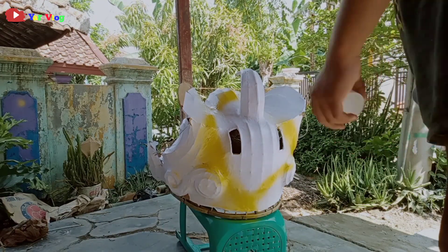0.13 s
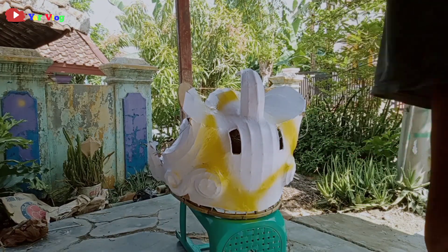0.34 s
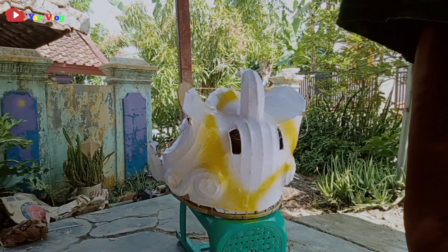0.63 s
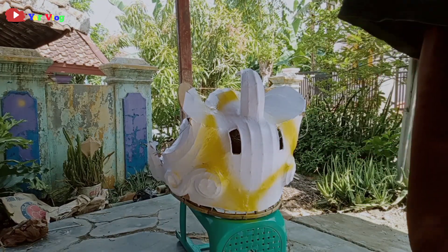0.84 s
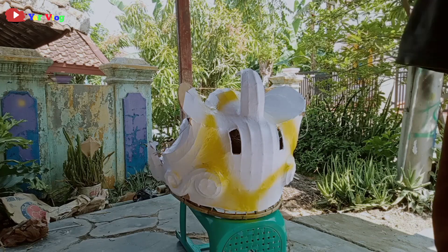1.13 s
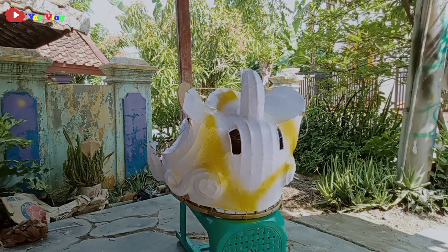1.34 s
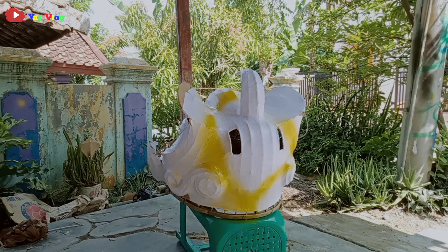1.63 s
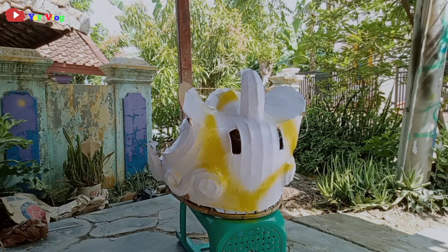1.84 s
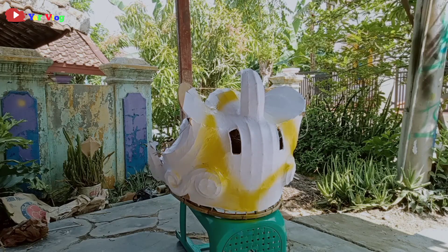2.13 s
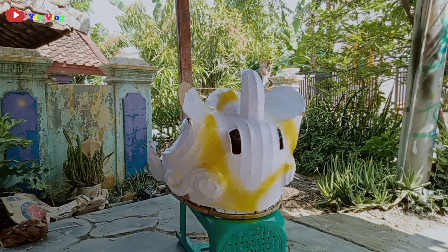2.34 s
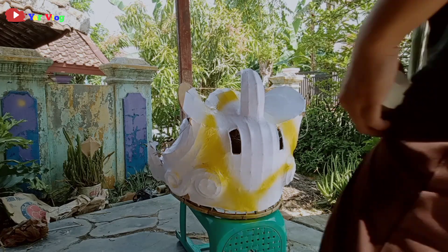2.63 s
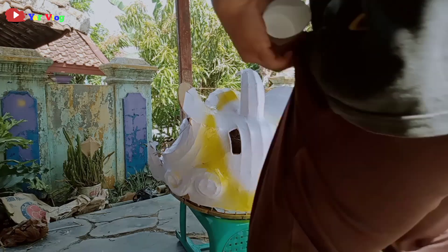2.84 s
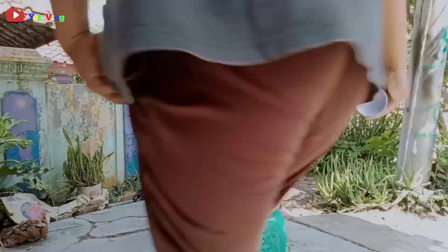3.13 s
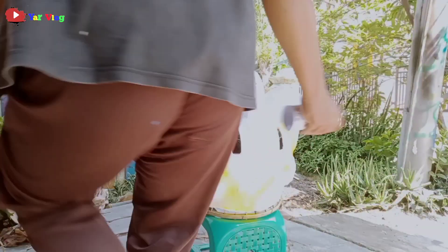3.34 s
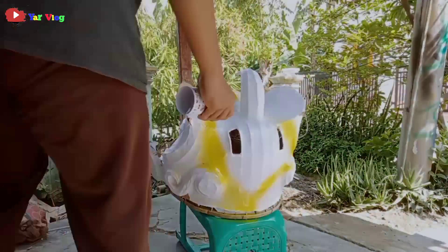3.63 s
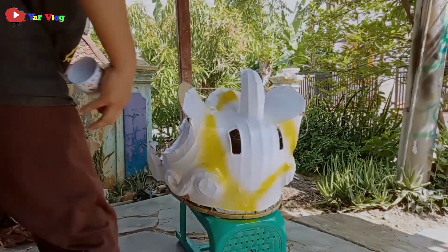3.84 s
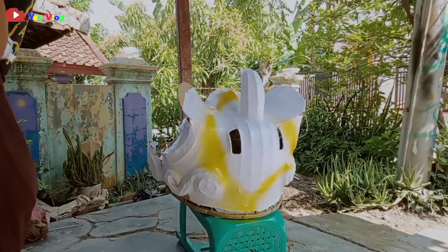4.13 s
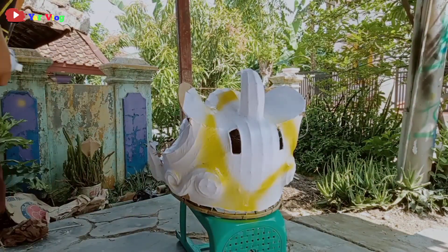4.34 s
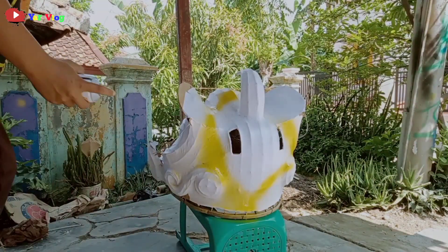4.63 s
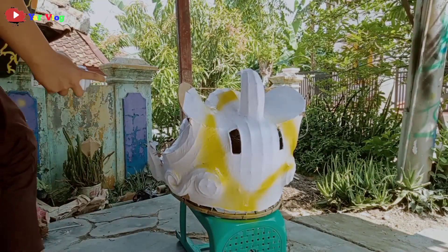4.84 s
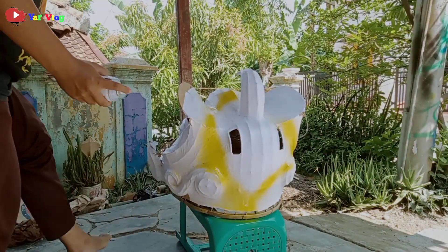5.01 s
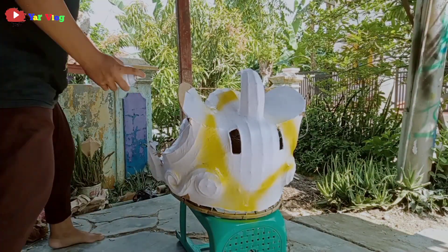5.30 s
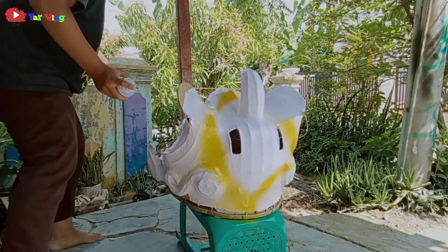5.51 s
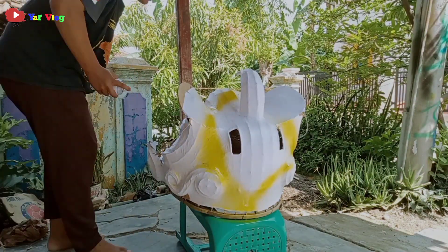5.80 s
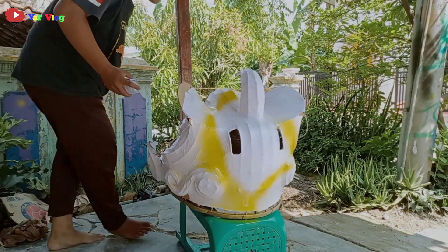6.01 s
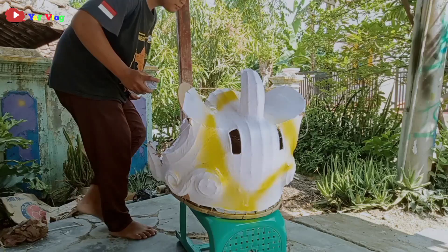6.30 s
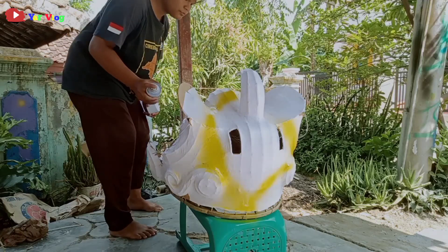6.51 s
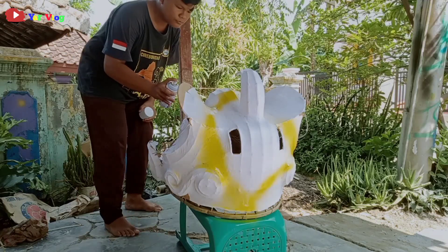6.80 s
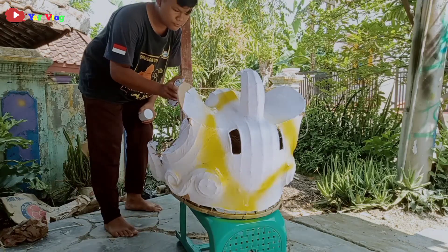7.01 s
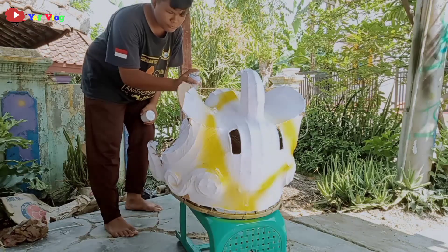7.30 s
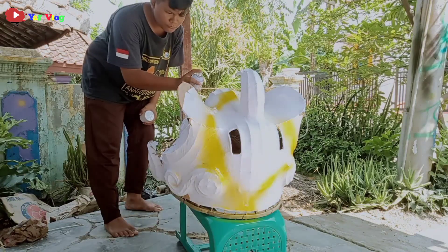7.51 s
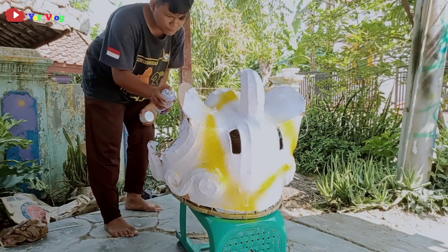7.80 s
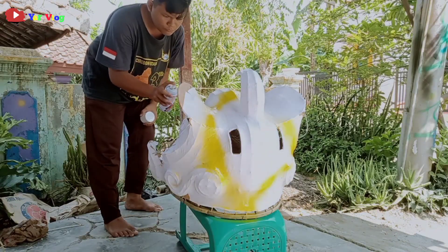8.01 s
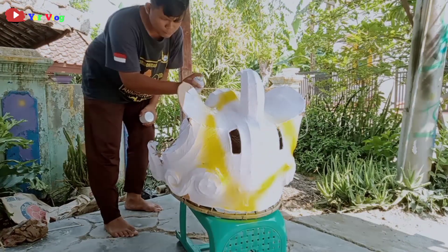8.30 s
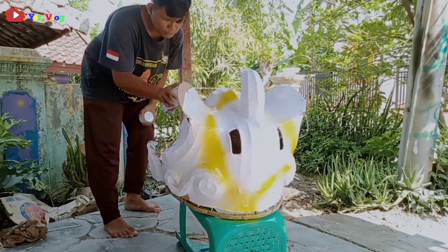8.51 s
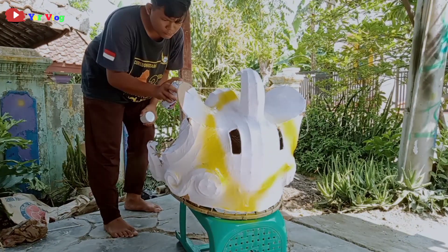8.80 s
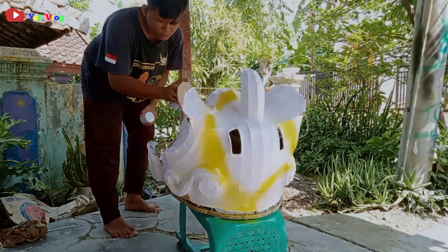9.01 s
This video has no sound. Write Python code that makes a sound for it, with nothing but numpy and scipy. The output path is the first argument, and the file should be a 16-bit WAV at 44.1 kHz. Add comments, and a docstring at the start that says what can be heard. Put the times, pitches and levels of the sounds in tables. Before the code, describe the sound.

Sharp metallic rattling of a ball inside a paint can, loosening and stopping, then brief spray bursts outdoors with a stray bird chirp.

```python
"""A can rattles on a paved terrace as it is shaken: a mixing ball knocks its ends, chatters and stirs paint.
Then three short bursts of noise hiss from the nozzle and drum on a hollow paper model.
Knocks are short impulse trains ringing damped modes; bird notes and hum are sines; town rumble and
footfalls are shaped noise. Short noise tails give the answer of the terrace."""
import sys
import numpy as np
from scipy import signal
from scipy.fft import rfft, irfft, next_fast_len
from scipy.io import wavfile
from scipy.ndimage import map_coordinates

SR = 44100
rng = np.random.default_rng(int(sys.argv[2]) if len(sys.argv) > 2 else 0)


def persist_wave(psi):
    """Save psi, clipped to +-1, as 16-bit WAV."""
    counts = np.round(np.clip(psi, -1, 1) * 32767).astype(np.int16)
    wavfile.write(sys.argv[1], SR, np.atleast_2d(counts).T)


N = 403515


def amp(db):
    """Gain of a level in dB."""
    return 10 ** (np.asarray(db) / 20)


def unit(x):
    """x at rms 1."""
    return x / np.sqrt(np.mean(x ** 2) + 1e-20)


def along(points, hz):
    """Values of (f/Hz, value) points, read on a log frequency axis."""
    f, v = np.transpose(points)
    return np.interp(np.log(hz + 1), np.log(f + 1), v)


def wobble(knots_hz):
    """Smooth random curve through normal knots."""
    knots = rng.standard_normal(int(N * knots_hz / SR) + 4)
    return map_coordinates(knots, [np.arange(N) * knots_hz / SR])


def filtered(x, response):
    """x times a complex response of frequency."""
    m = next_fast_len(N + SR // 2)
    return irfft(rfft(x, m) * response(np.fft.rfftfreq(m, 1 / SR)), m)[..., :N]


def resonance(f, center_hz, width_hz):
    """Band-pass mode, squared for steep skirts and a focused ring."""
    return (1j * f * width_hz / (center_hz ** 2 - f * f + 1j * f * width_hz)) ** 2


def ringing(train, modes):
    """One impulse train rings all modes."""
    center_hz, width_hz, db = np.transpose(modes)[..., None]
    return filtered(train, lambda f: amp(db) * resonance(f, center_hz, width_hz)).sum(0)


def rush(spectrum):
    """Noise of rms 1 with the given spectrum."""
    return unit(filtered(rng.standard_normal(N), lambda hz: amp(along(spectrum, hz))))


def gate(start_s, stop_s, edge_s, tail_s=None):
    """Open from start to stop with soft edges; the close may be slower."""
    t = np.arange(N) / SR
    ramp = np.minimum((t - start_s) / edge_s, (stop_s - t) / (tail_s or edge_s))
    return np.clip(ramp + .5, 0, 1) ** 2


# rumble and leaves, relative spectrum: f/Hz, level/dB per Hz
GARDEN = [(22, -15.5), (123, -1), (301, -16.5), (405, -5), (489, -22), (591, -7.5), (1230, -19.5),
          (1790, -13), (16000, -52.5)]
# hum partials: f/Hz, level/dB
HUM = [(115, -62), (300, -62.5), (440, -61.5), (699, -61.5)]
# dull thumps of passing feet: t/s, level/dB
STEPS = [(3.47, -44), (4.013, -51), (4.37, -48.5)]


def garden():
    """Shaped noise for rumble and leaves, wavering sines for hum, bass noise swells for feet."""
    t = np.arange(N) / SR
    hum = sum(amp(db + 4.1 * wobble(12)) * np.sin(2 * np.pi * hz * t) for hz, db in HUM)
    steps = sum(amp(db) * np.exp(-((t - s - .02) / 0.1) ** 2) for s, db in STEPS)
    thud = rush([(20, -63), (60, -1), (120, -3.5), (220, -48), (400, -120)])
    return amp(-51.5 + 0.29 * wobble(3.6)) * rush(GARDEN) + hum + steps * thud


# decay of the terrace: f/Hz, t60/s
TERRACE = [(400, 0.053), (3000, 0.26), (12000, 0.15)]
WANDER_RAD, WANDER_HZ = 1.6, 170  # phase wander of the echo: depth, knot rate


def terrace(x, part_s=0.15):
    """Paving, wall and posts answer with decaying noise, redrawn each part; random phase makes it diffuse."""
    out, size = np.zeros(N + SR), round(part_s * SR)
    for start in range(0, N, size):
        hz, t, z = signal.stft(rng.standard_normal(SR // 3), SR, nperseg=128)
        decay = amp(-60 * t / along(TERRACE, hz)[:, None])
        tail = signal.istft(z * decay, SR, nperseg=128)[1]
        wet = signal.fftconvolve(x[start:start + size], tail / np.linalg.norm(tail))
        out[start + 90:][:len(wet)] += wet  # 2 ms pre-delay
    analytic = signal.hilbert(out[:N], next_fast_len(N))[:N]
    return np.real(analytic * np.exp(1j * WANDER_RAD * wobble(WANDER_HZ)))


# chirps: t/s, f/Hz, level/dB
CHIRPS = [(7.02, 6400, -51), (8.57, 6380, -42)]


def bird():
    """Thin chirps: a sine with jittered phase and a weak octave, quick onset, drawn-out decay."""
    out, t = np.zeros(N + SR), np.arange(SR // 4) / SR
    for s, hz, db in CHIRPS:
        phase = 2 * np.pi * hz * t + np.cumsum(rng.normal(0, 0.048, len(t)))
        swell = amp(db - 60 * t / 0.16) * (1 - np.exp(-t / 0.0014))
        octave = amp(-18 - 60 * t / 0.17) * np.sin(2 * phase)
        out[round(s * SR):][:len(t)] += swell * (np.sin(phase) + octave)
    return out[:N]


# points of one swooping bird note: t/s, f/Hz, level/dB
TWITTER = [(3.225, 4900, -41), (3.243, 4100, -37), (3.256, 4630, -44)]


def twitter():
    """One thin sine that swoops down and up again."""
    s, hz, db = np.transpose(TWITTER)
    t = np.arange(N) / SR
    phase = 2 * np.pi * np.cumsum(np.interp(t, s, hz)) / SR
    return amp(np.interp(t, s, db, -200, -200)) * np.sin(phase)


# small ticks of can and feet: t/s, level before the scuff filter/dB
TICKS = [(8.5765, -32.5), (8.669, -36), (8.739, -34.5), (8.888, -34.5)]
# clothes and feet shifting: from t/s, to t/s, level before the scuff filter/dB
RUSTLE = [(6.896, 8.16, -46.5), (8.38, 8.96, -42.5)]


def ticks():
    """Decaying noise clicks over an uneven noise rustle, both dulled by one filter."""
    clicks, t = np.zeros(N + SR), np.arange(SR // 10) / SR
    for s, db in TICKS:
        clicks[round(s * SR):][:len(t)] += amp(db - 60 * t / 0.12) * rng.standard_normal(len(t))
    swell = sum(amp(db) * gate(start, stop, 0.15) for start, stop, db in RUSTLE)
    rustle = swell * amp(3.0 * wobble(12)) * rng.standard_normal(N)
    scuff = [(150, 5.5), (450, 1), (2800, 0.5), (7000, -20.0), (16000, -62)]
    return filtered(clicks[:N] + rustle, lambda hz: amp(along(scuff, hz)))


# bursts: from t/s, to t/s, hiss level/dB, splash level/dB
SPRAY = [(7.392, 7.63, -44, -58), (8.187, 8.46, -45, -57.5), (8.962, 9.3, -41, -43)]
# nozzle, relative spectrum: f/Hz, level/dB per Hz
HISS = [(1180, -15.5), (2000, -9), (3100, -7), (4300, -15), (9840, -33.5), (15500, -31)]
# paint drumming on the paper shell, relative spectrum: f/Hz, level/dB per Hz
SPLASH = [(120, -51), (200, -12), (437, -0.5), (542, -6), (6000, -30), (13200, -120)]


def spray():
    """Nozzle hiss and paint drumming on the paper shell: two gated, fluctuating noises."""
    hiss = rush(HISS) * amp(2.0 * wobble(23))
    splash = rush(SPLASH) * amp(2.5 * wobble(40))
    out = 0
    for start, stop, hiss_db, splash_db in SPRAY:
        burst = amp(hiss_db) * hiss + amp(splash_db) * splash
        out = out + gate(start, stop, 0.029, tail_s=0.05) * burst
    return out


# ball rolling through the paint: from t/s, to t/s, level/dB
CHATTER = [(0, 0.027, -25.5), (0.368, 0.46, -37), (0.627, 0.823, -46.5), (0.9, 0.988, -37),
           (2.101, 2.197, -34.5), (4.068, 4.14, -42)]


def chatter(per_s=1500, spread_db=5):
    """Dense tiny contacts of uneven size ring the modes of the can."""
    grains = (rng.random(N) < per_s / SR) * rng.standard_normal(N) * amp(spread_db * wobble(60))
    can = ringing(grains, CLACK) + amp(4) * ringing(grains, WALL) + amp(3) * ringing(grains, BODY)
    return sum(amp(db) * gate(start, stop, 0.079) for start, stop, db in CHATTER) * unit(can)


# blows of the ball: t/s, strength level/dB, hardness/dB
BLOWS = [(0.041, -20, -23), (0.123, -6, -5.5), (0.251, -17.5, -13), (0.274, -15, -17.5), (0.367, -6.5, -16),
         (0.384, -7.5, -7.5), (0.505, -16.5, -15), (0.52, -23, -11.5), (0.567, -25, -11), (0.619, -7, -9),
         (0.645, -10.5, -6), (0.68, -18, -1), (0.707, -13, -17.5), (0.922, -24, -23), (0.934, -19.5, -10),
         (0.969, -15, -11.5), (0.99, -22, -22), (1.032, -30, -11), (1.083, -2, -17), (1.096, -19, 3),
         (1.135, -19, -7), (1.18, -9, -11), (1.279, -19.5, -2.5), (1.339, -11.5, -6), (1.444, -20.5, -10.5),
         (1.488, -20.5, -7), (1.61, -12, -8.5), (1.637, -11.5, -6), (1.667, -17.5, -8.5),
         (1.702, -14.5, -11.5), (1.725, -22, -20), (1.845, -9.5, -5.5), (1.953, -11.5, -7),
         (1.979, -21, -17.5), (2.107, -13.5, -15), (2.147, -14.5, -2.5), (2.179, -11.5, -11.5),
         (2.201, -22, -19), (2.287, -23, 0), (2.3, -10.5, -11), (2.416, -15.5, -6.5), (2.436, -13.5, -13),
         (2.552, -16, -4), (2.601, -18, -15), (2.633, -15, -6.5), (2.659, -11.5, -11), (2.761, -12, -9.5),
         (2.771, -16.5, 1.5), (2.872, -15.5, -18.5), (3.015, -14.5, -6), (3.024, -6, -5), (3.04, -10, -7),
         (3.092, -13, -11.5), (3.124, -17.5, -11.5), (3.239, -16.5, -14), (3.249, -7, -18),
         (3.271, -0.5, -15.5), (3.279, -9, -5.5), (3.318, -5, -11.5), (3.38, -15, -18), (3.452, -6.5, -8),
         (3.482, -11, -7), (3.599, -1, -9), (3.628, -1.5, -13.5), (3.663, -7, -8), (3.687, -8.5, -9.5),
         (3.759, -12.5, -10), (3.816, -16, -17.5), (3.881, -26, -34), (3.889, -23, -24), (3.943, -39, -15),
         (3.964, -21, -19), (4.005, -31, -30), (4.206, -29.5, -9), (4.259, -19, -16.5), (4.324, -23, -9),
         (4.334, -23.5, -7), (4.446, -2.5, -17), (4.452, -1, -12), (4.482, -6.5, -15.5), (4.498, -9, -19),
         (4.509, -11, -19.5), (4.518, -9, -16.5), (4.56, -11, -17.5), (4.644, 1, -12), (4.672, -3, -15.5),
         (4.694, -7, -15), (4.727, -12, -8), (4.755, -21.5, -24), (4.799, -1, -20.5), (4.815, -3, -20.5),
         (4.893, 0, -9.5), (4.901, 2.5, -10), (4.966, -9.5, -12), (4.999, -13, -24.5), (5.027, -28, -11),
         (5.074, -12.5, -13.5), (5.091, -6.5, -14.5), (5.124, -21, -17), (5.171, 0.5, -9),
         (5.186, -10, -12.5), (5.25, -11, -20.5), (5.309, -30.5, -2.5), (5.422, -16, -0.5),
         (5.481, -20.5, -13), (5.521, -12, -17), (5.564, -7, -17), (5.592, -32, 1.5), (5.661, -18.5, 0.5),
         (5.666, -6, -3), (5.744, -20.5, -20), (5.789, -8, -16.5), (5.809, -10.5, -15), (5.879, -11, -8.5),
         (5.886, -6, -3), (6.016, -8, -16), (6.041, -19, -13), (6.151, -21, -13), (6.162, -6.5, -9.5),
         (6.198, -13.5, -10.5), (6.226, -25, -7), (6.246, -8, -14), (6.329, -14, -12.5),
         (6.666, -18, -14.5), (6.739, -25.5, -11), (6.782, -21, -12), (6.836, -33, -7.5),
         (6.876, -34.5, -9)]
BOUNCE_FROM_S, BOUNCE_TO_S = .012, .11  # span after each blow
BOUNCE_DB, BOUNCE_FALL_DB, BOUNCE_DULL_DB = -15, 12, 1  # first level, fall over the span, lost hardness


def contacts(count=4):
    """Every blow, and after each a few weaker, duller knocks at chance moments."""
    s, db, hard_db = np.transpose(BLOWS)[..., None]
    when, size = rng.random((len(s), 2, count)).transpose(1, 0, 2)
    bounce_s = s + BOUNCE_FROM_S + when * (BOUNCE_TO_S - BOUNCE_FROM_S)
    bounce_db = db + BOUNCE_DB - BOUNCE_FALL_DB * when - 8 * size
    bounce_hard_db = np.repeat(hard_db - BOUNCE_DULL_DB, count, axis=1)
    pairs = (s, bounce_s), (db, bounce_db), (hard_db, bounce_hard_db)
    return [np.hstack(pair).ravel() for pair in pairs]


FIRST_DB = -2  # first touch relative to the full contact
SOFT_HZ = 5360  # the film of paint on the ball dulls the ring above
TREBLE_HZ = 6000  # modes above ring from the skid, without the film


def struck(s, smear_db, modes, levels_db, detune, skid_s, skid_db, films=2, pitch=1, count=11, size=3072):
    """First touch, full contact and weaker skid ring each mode at a new strength and pitch per knock."""
    order, f = np.arange(count), np.fft.rfftfreq(size, 1 / SR)
    moment, fade, sign = rng.random((3, len(s), count))
    luck, tune = rng.random((2, len(modes), len(s))) - .5

    touch_s = order * (0.001636 + .0012 * moment)
    late_s = np.where(order > 1, .003 + skid_s * moment ** 1.5, touch_s)
    fall_db = skid_db + smear_db[:, None] - 12 * late_s / skid_s - 13 * fade
    tap_db = np.where(order > 1, fall_db, FIRST_DB * (1 - order))
    taps = np.where(order > 1, np.sign(sign - .5), 1) * amp(tap_db)
    where = (np.arange(len(s))[:, None] * size + np.round(late_s * SR).astype(int)).ravel()

    def train(x):
        """Spectra of the impulse trains, one row per knock."""
        return rfft(np.bincount(where, x.ravel(), len(s) * size).reshape(-1, size))

    film = 1 / (1 + 1.2j * f / SOFT_HZ - (f / SOFT_HZ) ** 2)
    whole = film ** films * train(taps)
    skid = train(taps * amp(-14 * (order < 2)))
    rung = 0
    for (hz, width_hz, _), level_db, one, shift in zip(modes, levels_db, luck, tune):
        center_hz = (hz * pitch * (1 + 2 * detune * shift))[:, None]
        push = amp(level_db + 6 * one)[:, None] * (skid if hz > TREBLE_HZ else whole)
        rung = rung + push * resonance(f, center_hz, width_hz)
    at = np.round(s * SR).astype(int)[:, None] + np.arange(size)
    return np.bincount(at.ravel(), irfft(rung, size).ravel(), N)[:N]


# body modes: f/Hz, width before squaring/Hz, level/dB
BODY = [(538, 267, -6.5), (964, 250, -0.5), (1282, 530, 4), (1690, 730, 0)]
BODY_DB, BODY_GROWS, BODY_SOFT = 10, 0.54, 0.14  # drive/dB, growth per dB strength, loss per dB hardness
DETUNE = 0.12  # each knock draws its clack and body pitches at random within this share


def body(s, strength_db, hard_db, grip_db, thump_db, smear_db):
    """Low knock of the can body with a short skid; the lowest mode thumps."""
    drive_db = BODY_DB + BODY_GROWS * strength_db - BODY_SOFT * hard_db - 0.75 * grip_db
    levels_db = [drive_db + db for _, _, db in BODY]
    levels_db[0] = levels_db[0] + thump_db
    return struck(s, smear_db, BODY, levels_db, DETUNE, skid_s=.012, skid_db=-13)


# wall modes: f/Hz, width before squaring/Hz, level/dB; GRIP moves the pitch
WALL = [(2300, 240, 6), (2750, 600, -4)]
WALL_DB, WALL_GROWS, WALL_SOFT = 8, 0.76, 0.42  # drive/dB, growth per dB strength, loss per dB hardness
WALL_DETUNE = .025  # smaller random share: the wall keeps its pitch better


def wall(s, strength_db, hard_db, wall_hz, grip_db, smear_db):
    """Narrow ring of the wall with a short skid, its pitch following the hold of the can."""
    drive_db = WALL_DB + WALL_GROWS * strength_db - WALL_SOFT * hard_db + grip_db
    levels_db = [drive_db + db for _, _, db in WALL]
    pitch = wall_hz / WALL[0][0]
    return struck(s, smear_db, WALL, levels_db, WALL_DETUNE, skid_s=.012, skid_db=-14, pitch=pitch)


# clack modes: f/Hz, width before squaring/Hz, level/dB
CLACK = [(3330, 1720, 3.5), (4285, 990, 3.5), (4950, 660, -8), (8920, 3800, -20), (15200, 23000, -28)]
CLACK_DB = 23  # drive before strength and hardness
BRIGHTER = 0.64  # tilt to upper modes, dB per dB of hardness and log step of pitch
TREBLE_GROWS, TREBLE_SMEAR = 0.04, 1  # treble: extra growth per dB of drive, loss per dB of smear


def clack(s, strength_db, hard_db, smear_db):
    """Hard, broad clack with the longest skid; harder blows favour its upper modes."""
    drive_db = CLACK_DB + strength_db + hard_db
    levels_db = []
    for hz, _, mode_db in CLACK:
        tilt_db = BRIGHTER * hard_db * np.log(np.minimum(hz, TREBLE_HZ) / CLACK[0][0])
        level_db = drive_db + mode_db + tilt_db
        if hz > TREBLE_HZ:
            level_db = level_db + TREBLE_GROWS * drive_db - TREBLE_SMEAR * smear_db
        levels_db.append(level_db)
    return struck(s, smear_db, CLACK, levels_db, DETUNE, skid_s=.04, skid_db=-6, films=1)


# hold and tilt of the can, paint lying here or there:
# t/s, wall f/Hz, wall-over-body level/dB, low thump level/dB, skid and echo level (smear)/dB
GRIP = [(0.599, 2260, 3.5, 8.5, 3.5), (1.2, 2276, 6, 0.5, 1), (1.72, 1920, 6, 6, 2.5),
        (2.0, 1914, 4, 3, 2.5), (2.3, 2370, 5.5, 1, 5), (2.9, 1963, 5, 3.5, 1), (3.7, 2006, 7, -2.5, -3.5),
        (3.85, 1670, -2, -13, -4), (4.3, 1920, 0, 2.5, -1), (4.45, 2348, 5.5, -2, -6.5),
        (5.5, 2190, 1.5, 2.5, -3), (5.8, 2450, 0.5, 5.5, -1), (6.2, 2230, 5.5, 3.5, -2.5),
        (6.8, 2455, 6, 2, 1)]


def blows():
    """The ball hits the can: clack, wall and body ring from the same contacts, coloured by the grip."""
    s, strength_db, hard_db = contacts()
    grip_s, *hold = np.transpose(GRIP)
    wall_hz, grip_db, thump_db, smear_db = (np.interp(s, grip_s, column) for column in hold)
    return (clack(s, strength_db, hard_db, smear_db),
            wall(s, strength_db, hard_db, wall_hz, grip_db, smear_db),
            body(s, strength_db, hard_db, grip_db, thump_db, smear_db))


def scene():
    """Can, ticks and bird with the terrace's answer, plus dry spray and garden."""
    clacks, walls, bodies = blows()
    bright = clacks + chatter() + ticks() + bird() + twitter()
    grip_s, *_, smear_db = np.transpose(GRIP)
    smear = amp(np.interp(np.arange(N) / SR, grip_s, smear_db))
    echo = terrace(smear * (amp(-4.0) * bright + amp(-4) * walls + amp(-2) * bodies))
    return (bright + walls + bodies + echo + spray() + garden())[None]


CEILING = 1  # peaks are squeezed towards this
LOW_HZ, TOP_HZ = 41.6, 15600  # bass corner, band limit


def record(dry):
    """Tall peaks are softly squeezed below full scale; deepest bass is thinned, top cut at the band limit."""
    soft = dry / (1 + np.abs(dry / CEILING) ** 4) ** .25
    return filtered(soft, lambda hz: (hz < TOP_HZ) * (1j * hz / (LOW_HZ + 1j * hz)) ** 2)


dry = scene()
out = record(dry)
persist_wave(out)
```